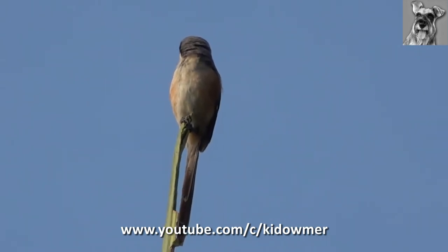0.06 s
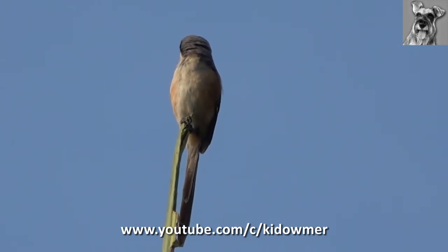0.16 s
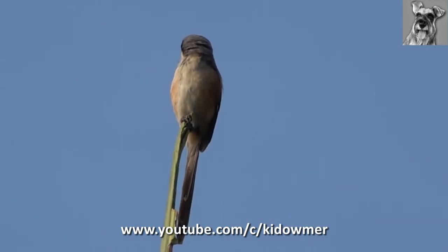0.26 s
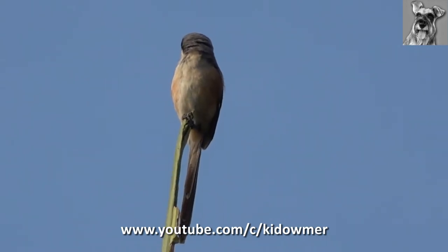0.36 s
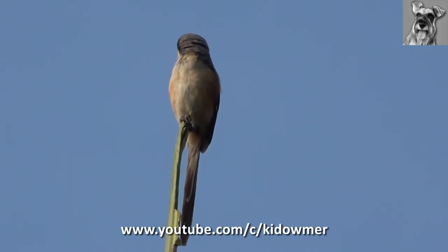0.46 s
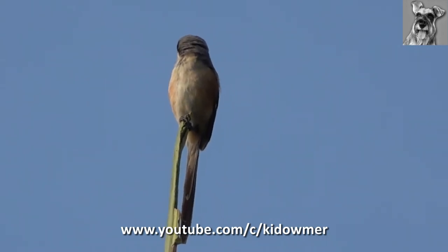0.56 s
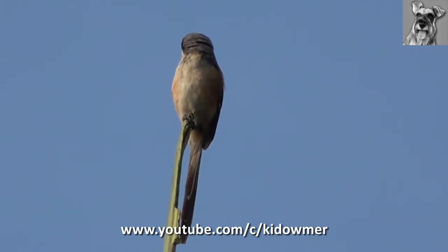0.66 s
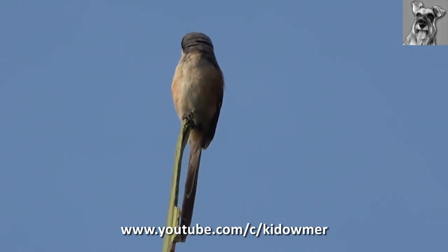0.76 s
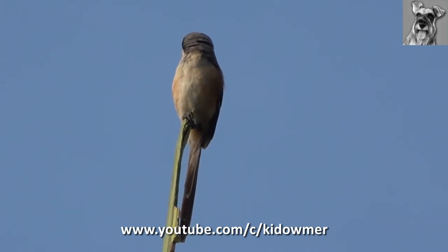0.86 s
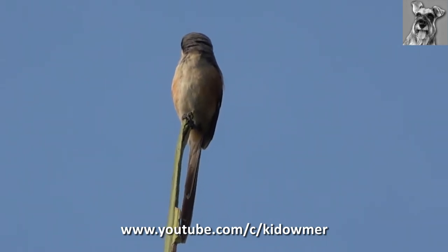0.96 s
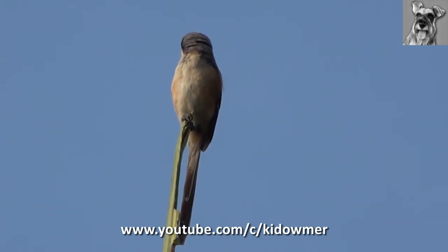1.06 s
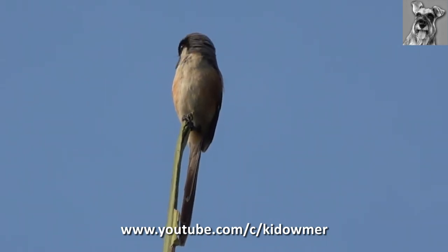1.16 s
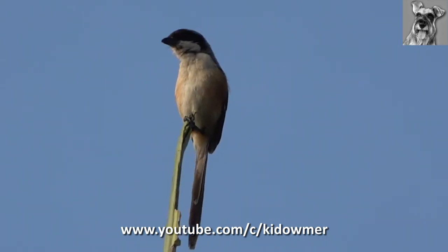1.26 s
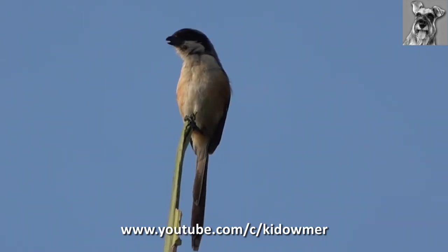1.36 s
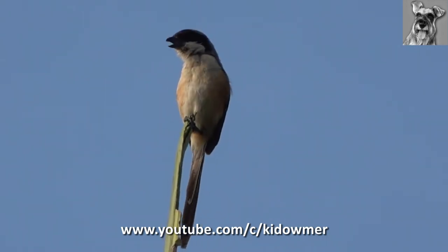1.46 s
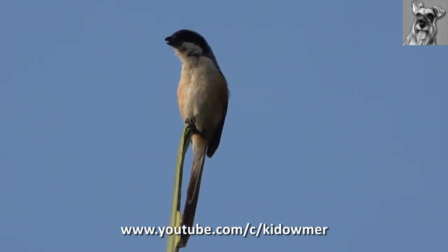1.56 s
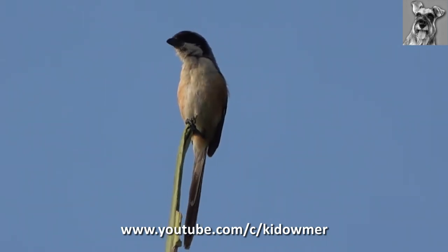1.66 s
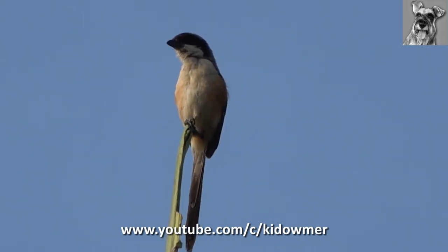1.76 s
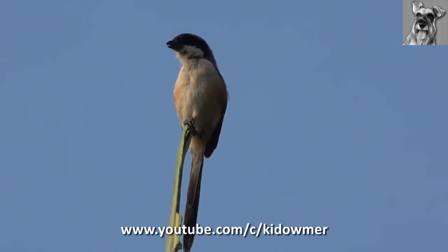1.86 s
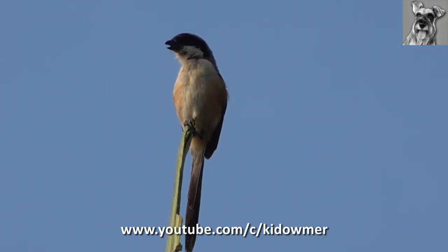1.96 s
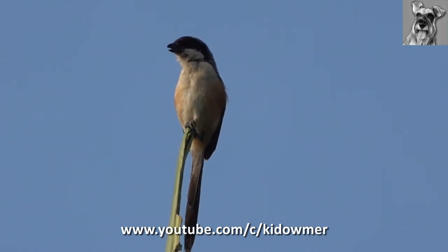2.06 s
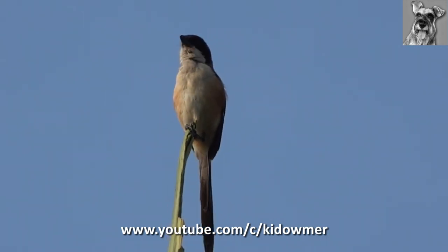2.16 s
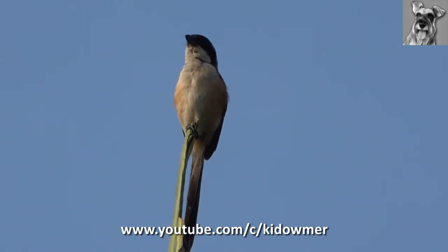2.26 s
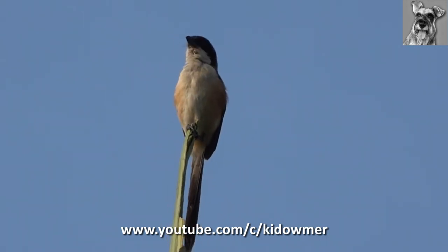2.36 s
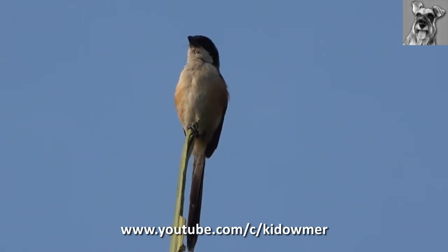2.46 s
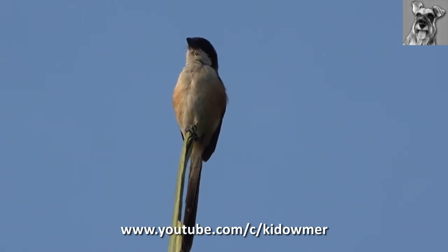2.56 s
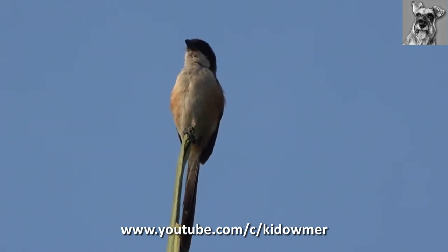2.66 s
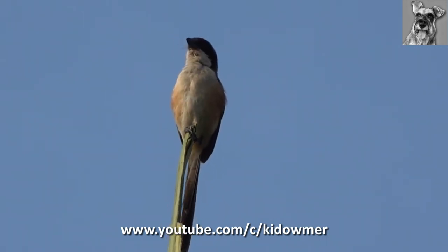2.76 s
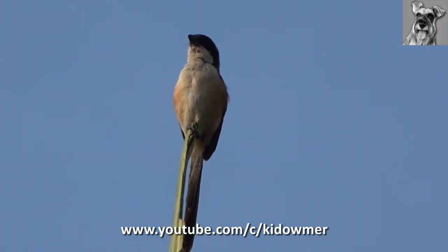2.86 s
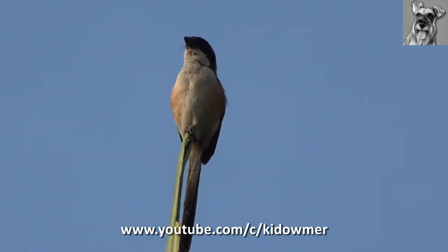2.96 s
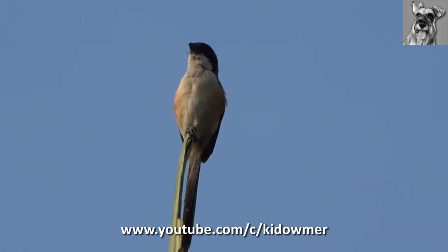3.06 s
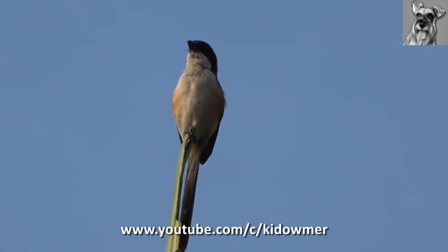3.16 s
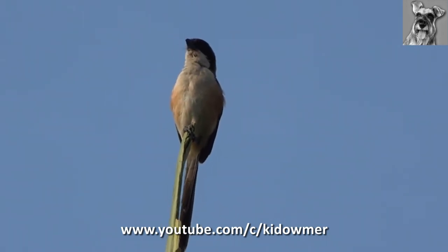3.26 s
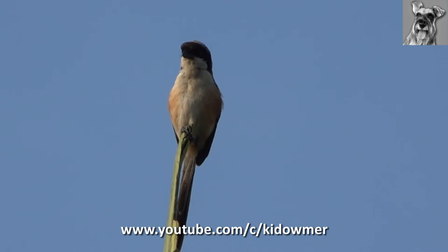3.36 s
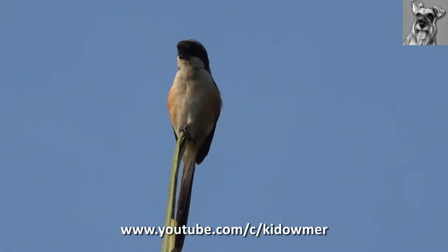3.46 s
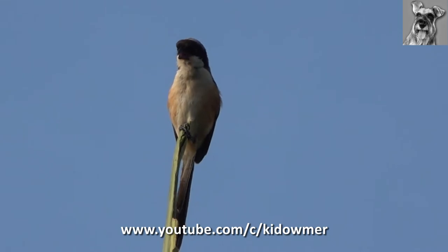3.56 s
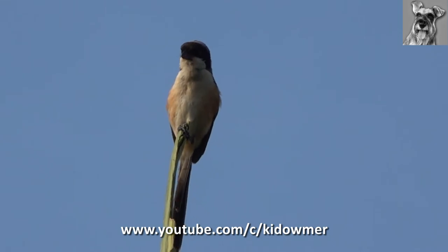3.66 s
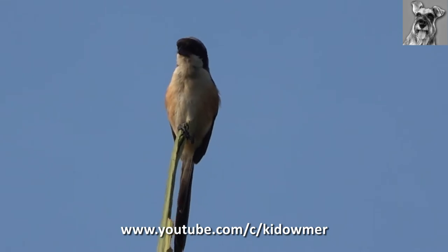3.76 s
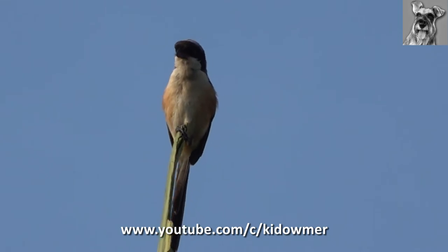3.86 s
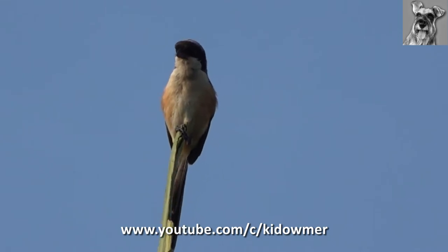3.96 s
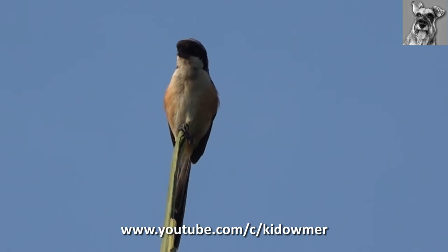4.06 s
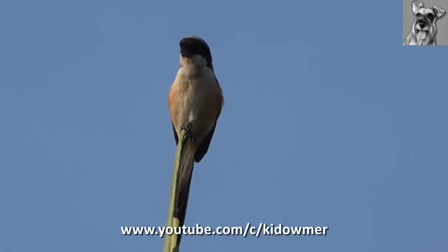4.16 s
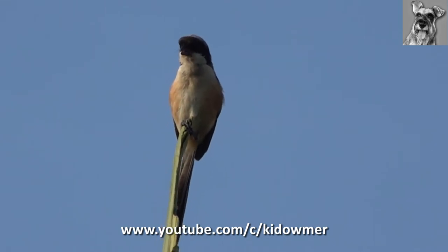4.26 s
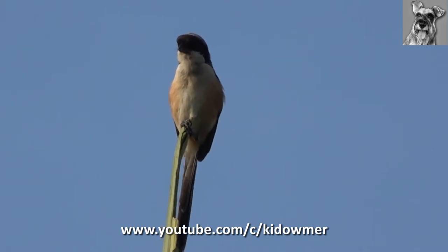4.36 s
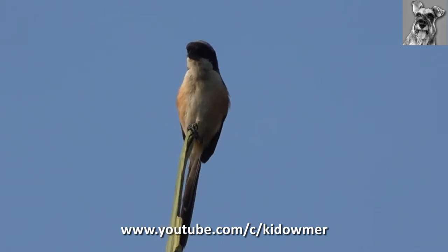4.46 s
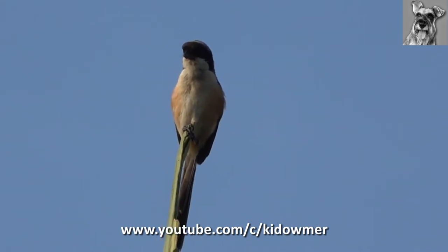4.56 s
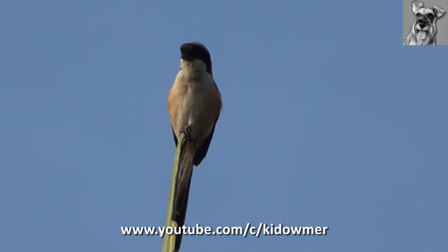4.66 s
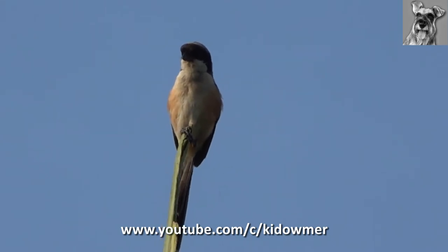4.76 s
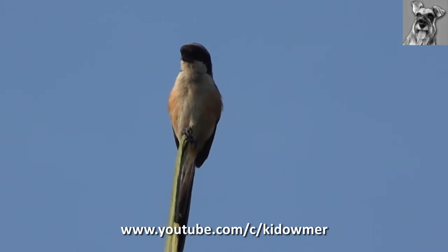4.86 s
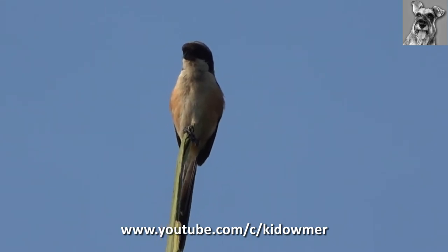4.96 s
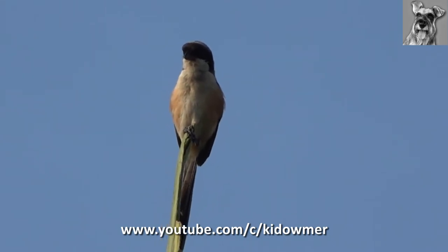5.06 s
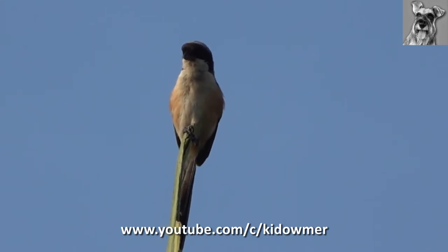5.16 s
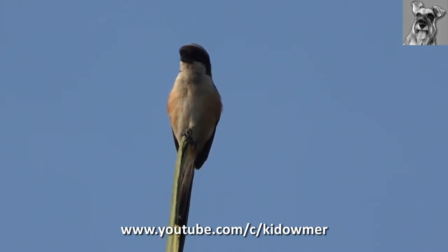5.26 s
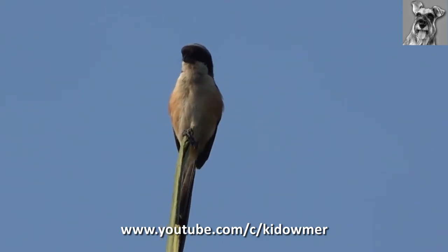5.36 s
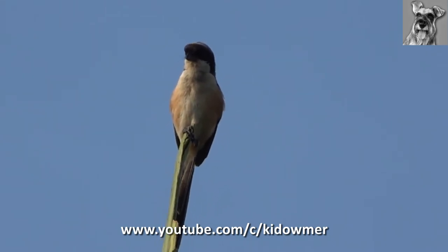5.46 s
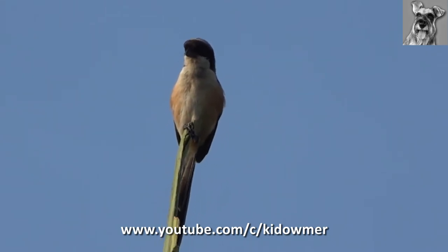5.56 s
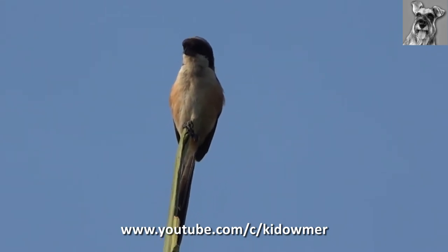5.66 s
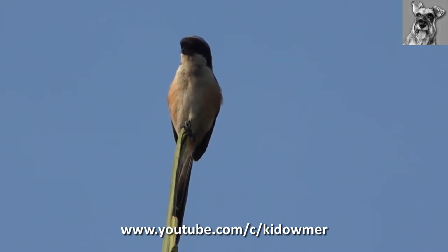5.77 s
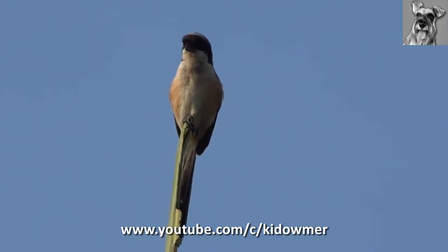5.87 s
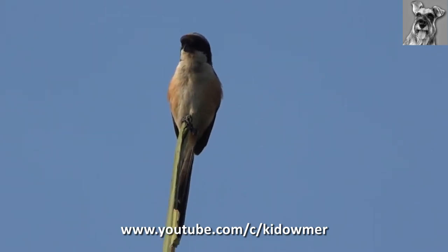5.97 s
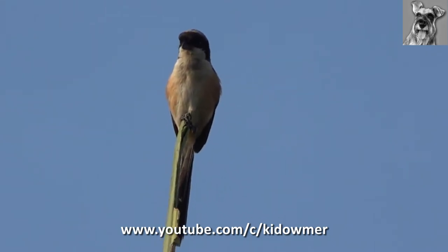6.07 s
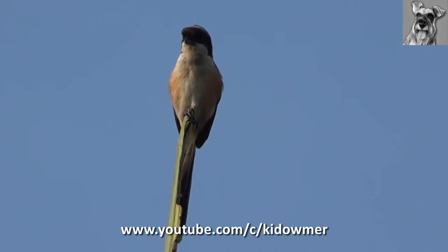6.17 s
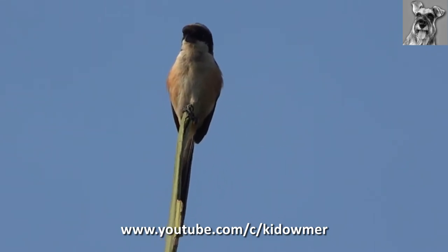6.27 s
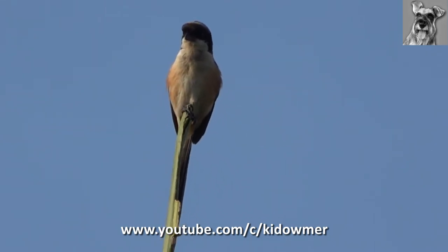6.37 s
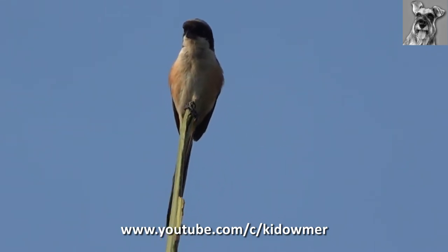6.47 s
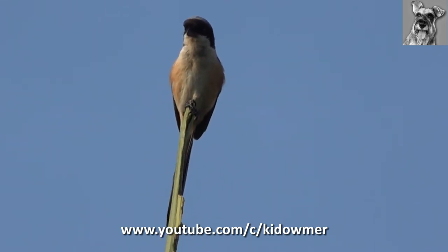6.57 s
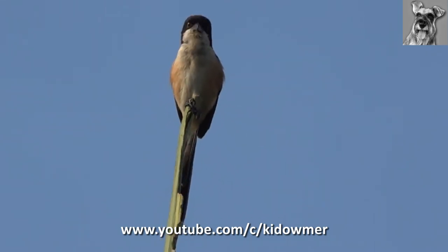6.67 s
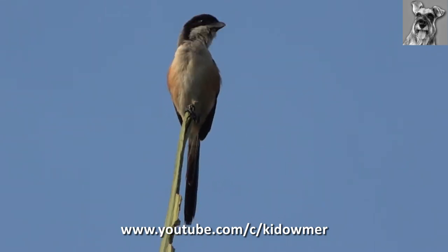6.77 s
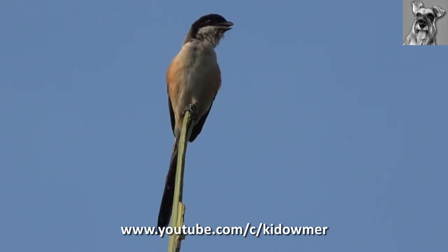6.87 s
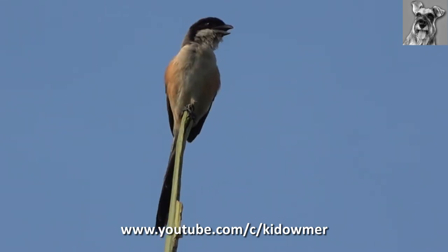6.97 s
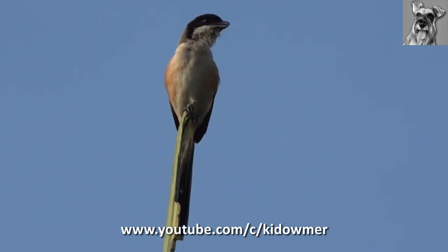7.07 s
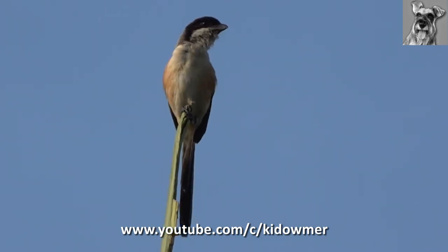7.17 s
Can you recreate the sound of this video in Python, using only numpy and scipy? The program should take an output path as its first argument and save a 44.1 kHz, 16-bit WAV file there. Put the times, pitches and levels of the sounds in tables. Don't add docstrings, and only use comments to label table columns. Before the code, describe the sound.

Five raspy, rattling bird calls of a quarter second each, spaced unevenly, above shrill constant insect hiss, faint crickets, tiny chips and distant traffic.

```python
import sys
import numpy as np
from scipy import signal
from scipy.fft import rfft, irfft, next_fast_len
from scipy.io import wavfile
from scipy.ndimage import uniform_filter1d

SR = 44100
rng = np.random.default_rng(int(sys.argv[2]) if len(sys.argv) > 2 else 0)


def magnitude_from_level(level_db):
    exponent = np.asarray(level_db, float) / 20
    return 10 ** exponent


def output_pcm(signal):
    pcm = np.clip(np.atleast_2d(signal).T, -1, 1) * 32767
    wavfile.write(sys.argv[1], SR, np.round(pcm).astype(np.int16))


N = 318843
HZ = np.fft.rfftfreq(next_fast_len(N), 1 / SR)

# (frequency [Hz], likeness [0-1])
PORT_LIKENESS = [(60, 0.997), (150, .996), (380, 0.955), (950, 0.965), (2380, 0.87), (5980, 0.9),
                 (15000, 0.97)]
# (frequency [Hz], left minus right [dB])
PORT_LEAN = [(60, 0), (150, 0), (380, 0.0), (950, 0.59), (2380, 1.7), (5980, 2.0), (15000, 1.1)]
# (frequency [Hz], density [dB per Hz])
ROAD_SPECTRUM = [(15, -54), (25, -33), (75, -10), (127, -6), (178, -9.5), (266, -17), (570, -5.5),
                 (967, 0.5), (1480, -7.5), (1860, -16), (2610, -23.5), (3900, -28.5), (5070, -51),
                 (8580, -120)]
# (frequency [Hz], density [dB per Hz])
CICADA_SPECTRUM = [(7400, -48.5), (8300, -37.5), (8700, -23.5), (9200, -10.5), (9900, -9), (10300, -3),
                   (10700, -0.5), (11200, -3.5), (11600, -9.5), (12000, -21.5), (12500, -28), (13000, -33),
                   (13600, -34.5)]
# (frequency [Hz], level [dB])
FAR_INSECT_SPECTRUM = [(2500, -32), (3900, -1.5), (5600, -4), (7600, 1), (8200, -16), (9000, -34)]
# (centre [Hz], width [Hz], level [dB])
BUZZERS = [(6560, 540, -62), (4664, 530, -69)]
# (start [s], length [s], level [dB])
LOW_CRICKET = [
    (.566, 0.3, -67),
    (1.701, .33, -67),
    (2.856, 0.29, -67.5),
    (3.863, 0.3, -65.5),
    (4.6, .4, -74.5),
    (5.047, .27, -69),
    (5.971, 0.35, -67),
    (7.122, .3, -66),
]
MID_CRICKET = [(.01, 0.24, -71), (.324, .7, -67), (1.713, 0.64, -71), (2.32, 0.29, -72), (2.825, .34, -71),
               (3.2, 0.22, -74), (3.764, 0.62, -66.5), (4.615, 0.75, -65), (5.792, .66, -66.5),
               (6.522, 0.36, -75), (7.1, .3, -63)]
HIGH_CRICKET = [
    (.704, .33, -69),
    (1.751, .33, -66),
    (2.866, 0.32, -68.5),
    (3.867, .3, -67),
    (4.836, 0.31, -67.5),
    (5.89, 0.26, -66.5),
    (6.2, .6, -83),
    (6.915, 0.36, -68),
]
# (start [s], length [s], from [Hz], to [Hz], level [dB])
BIRD_CHIPS = [(0.046, .07, 4000, 3200, -73), (0.963, 0.035, 2900, 2520, -67), (1.227, .06, 3200, 2690, -67),
              (2.22, .05, 4200, 3900, -61), (.95, 0.033, 3900, 3440, -63), (1.03, 0.11, 4250, 3950, -65),
              (1.102, .09, 4080, 3830, -66), (1.187, 0.034, 3500, 3300, -66.5),
              (1.31, .05, 3600, 3370, -64), (1.76, .015, 4500, 4300, -67), (5.72, .02, 4000, 3880, -66),
              (1.255, 0.04, 3330, 3920, -60), (1.732, 0.023, 3930, 4200, -55),
              (2.17, 0.017, 4020, 3780, -57), (5.484, 0.02, 4200, 3700, -64),
              (5.517, 0.031, 3920, 3760, -65), (5.803, 0.045, 4200, 3320, -57),
              (5.882, 0.017, 2900, 3230, -61), (5.893, 0.026, 3500, 3630, -57)]
# (start [s], length [s], effort [dB], steady whistle re effort [dB], flutter [Hz])
SHRIKE_CALLS = [
    (1.378, 0.23, -38, -6, 109.5),
    (1.874, 0.24, -39.5, -5, 109.1),
    (3.457, 0.23, -40, -3.5, 107.7),
    (4.114, 0.217, -40, -4, 105.8),
    (6.868, 0.23, -38.5, -2.5, 108.3),
]
HEAD_TURN = [0, 0, -4, -4, -17]
# (from [s], to [s], strain [0-1])
STRAIN = [
    (1.435, 1.476, 0.8),
    (1.588, 1.618, 0.82),
    (1.979, 2.046, .75),
    (2.05, 2.11, .9),
    (3.584, 3.687, .85),
    (4.224, 4.258, 0.8),
    (4.281, 4.327, 0.98),
    (6.963, 7.0, .7),
    (7.003, 7.092, 0.95),
]
# (multiple, level [dB])
PARTIALS = [(1, 0), (2, 2.5), (3, 1), (4, -4), (5, -15), (6, -27)]
# (centre [Hz], width [Hz], level [dB])
WINDPIPE = [(3563, 300, -2), (3930, 420, -1), (4350, 300, -5), (5090, 290, -3.5), (5930, 170, 1.5),
            (7050, 590, -5)]
# (frequency [Hz], level [dB])
THROAT = [(1400, -18), (1850, -0.5), (2400, -6.5), (3100, 2), (4200, 1.5), (5200, -6), (5600, -9),
          (7000, -13), (8000, -4), (9000, -3.5), (12000, -14), (14500, -3), (16000, -17)]
# (delay [s], left level [dB], right level [dB])
NEAR_ECHOES = [
    (.0023, -18.5, -33),
    (.0041, -11, -15.5),
    (.0068, -16, -20),
    (0.0113, -13, -12.5),
]
# (frequency [Hz], share [0-1])
SILENT_SHARE = [(5100, 0), (5500, .1), (5900, 0), (7300, 0), (7600, .22), (8100, .22), (8400, 0),
                (12700, 0), (13100, .25), (13500, .7), (14400, .81), (15200, .87), (16000, .91)]


def evened(x):
    return x / np.sqrt(np.mean(x ** 2) + 1e-20)


def read(points, hz):
    f, value = np.transpose(points)
    return np.interp(np.log(hz + 1), np.log(f + 1), value)


def coloured(x, points):
    count = x.shape[-1]
    size = next_fast_len(count)
    gain = magnitude_from_level(read(points, np.fft.rfftfreq(size, 1 / SR)))
    return irfft(rfft(x, size) * gain, size)[..., :count]


def drift(count, smooth):
    once = uniform_filter1d(rng.standard_normal(count), int(smooth))
    return evened(uniform_filter1d(once, int(smooth)))


def oscillation(hz):
    return 2 * np.pi * np.cumsum(hz) / SR


def resonate(x, hz, width):
    turn = np.exp(2j * np.pi * hz * np.arange(x.shape[-1]) / SR)
    r = np.exp(-np.pi * width / SR)
    smooth = signal.lfilter([(1 - r) ** 2], [1, -2 * r, r * r], x / turn)
    return 2 * (turn * smooth).real


def add(mix, s, sound):
    part = mix[..., round(s * SR):][..., :sound.shape[-1]]
    part += sound[..., :part.shape[-1]]


def far_noise(colour_db):
    a, b = rng.standard_normal((2, len(HZ))) + 1j * rng.standard_normal((2, len(HZ)))
    apart = np.sqrt((1 - np.clip(read(PORT_LIKENESS, HZ), 0, 1)) / 2) * (HZ < 11800)
    lean = magnitude_from_level(read(PORT_LEAN, HZ) / 2)
    ports = np.array([(a + apart * b) * lean, (a - apart * b) / lean])
    return evened(irfft(ports * magnitude_from_level(colour_db), next_fast_len(N))[:, :N])


def road():
    swell_db = -55 + 0.46 * drift(N, 7700)
    return magnitude_from_level(swell_db) * far_noise(read(ROAD_SPECTRUM, HZ))


def cicadas():
    throb = 1 + .16 * np.sin(oscillation(133.3 + .8 * drift(N, 6000)))
    swell_db = -43.36 + .5 * drift(N, 3900)
    air_loss_db = read([(13000, 0), (16000, -6)], HZ)
    out = magnitude_from_level(swell_db) * throb * far_noise(read(CICADA_SPECTRUM, HZ) + air_loss_db)
    out += magnitude_from_level(-75.5) * far_noise(read(FAR_INSECT_SPECTRUM, HZ))
    for hz, width, db in BUZZERS:
        waver_db = 1.1 * drift(N, 1500)
        band_db = -10 * np.log10(1 + (2 * (HZ - hz) / width) ** 6)
        out += magnitude_from_level(db + waver_db) * far_noise(band_db)
    return out


def cricket(phrases, hz, chirps_hz):
    out = np.zeros(N)
    for s, length, db in phrases:
        t = np.arange(0, length, 1 / SR)
        turns = np.cumsum(chirps_hz + 0.287 * drift(len(t), 3200)) / SR
        chirp = np.clip(np.sin(2 * np.pi * turns) + 0.54, 0, 1)
        strokes = (0.45 + 0.54 * np.cos(6 * np.pi * turns)) * chirp
        slide_hz = 70.4 * np.sin(-6 * np.pi * turns)
        wing = np.sin(oscillation(hz + slide_hz + 40 * drift(len(t), 90)))
        swell_db = db - 1.5 * (1 - 2 * t / length)
        swell = magnitude_from_level(swell_db) * signal.windows.tukey(len(t), .06)
        add(out, s, swell * evened(strokes * wing))
    return out


def small_birds():
    out = np.zeros(N)
    for s, length, from_hz, to_hz, db in BIRD_CHIPS:
        count = round(length * SR)
        hz = np.linspace(from_hz, to_hz, count) + 110 * drift(count, 30)
        flicker_db = 4 * drift(count, 90)
        add(out, s, magnitude_from_level(db + flicker_db) * np.hanning(count) * np.sin(oscillation(hz)))
    return out


def flung_side(pitch, swing, jump, other):
    phase = oscillation(pitch)
    out = sum(magnitude_from_level(db) * np.cos(k * phase) * (k * pitch < SR / 2 - 2000) for k, db in PARTIALS)
    out *= 1 + swing * ((0.51 + 2.2 * jump) * np.cos(other) + 0.85 * np.cos(2 * other))
    return out * magnitude_from_level(2.2 * swing - 2.3 * jump + 0.95 * drift(len(pitch), 78))


def steady_side(level_db, swing, jump, strain, other):
    level_db = level_db - 2 - 3.2 * jump + 1.5 * (swing - .6) + 1.5 * drift(len(swing), 70)
    strained = magnitude_from_level(0.5) * np.cos(9 * other / 2) + magnitude_from_level(-7) * np.cos(3 * other)
    upper = magnitude_from_level(-14) * np.cos(5 * other)
    tones = np.cos(4 * other) + swing ** 2 * (strain ** 2 * strained + upper)
    return magnitude_from_level(level_db) * np.sqrt(2) * tones


def vocal_tract(flung, steady, beak_db, facing_db):
    voice = evened(flung) + 0.42 * rng.standard_normal(len(flung))
    ringing = sum(magnitude_from_level(db) * resonate(voice, hz, width) for hz, width, db in WINDPIPE)
    voice = coloured(voice + ringing, THROAT)
    voice = evened(evened(voice) + steady)
    treble = coloured(voice, [(7000, -40), (8500, -6), (10000, 0), (13300, 0), (14800, facing_db)])
    return coloured(voice, [(7000, 0), (8500, -6), (10000, -40)]) + magnitude_from_level(beak_db) * treble


def call(start, length, top_db, steady_db, flutter_hz, facing_db):
    low_hz, top_hz, strained_hz, second_hz = 2350, 3470, 3940, 1143
    age = np.arange(0, length, 1 / SR)
    t = start + age
    count = len(t)
    effort_db = top_db - 20 * np.exp(-age / 0.018) - 3 * (1 - age / length)
    effort_db = effort_db - 12 * np.exp((age - length) / 0.011)
    beak_db = -5 * np.exp(-age / 0.047)

    turns = np.cumsum(flutter_hz + 3 * (age / length - .5) + 1.58 * drift(count, 260)) / SR
    push = .5 - .5 * np.cos(2 * np.pi * turns) + 0.0403 * drift(count, 79)
    strain = uniform_filter1d(sum(share * (t > a) * (t < b) for a, b, share in STRAIN), 200)
    tension = 1 + .018 * (uniform_filter1d(strain, int(.08 * SR)) - .5)
    strain = np.clip(strain + 0.0696 * drift(count, 255), 0, 1)
    swing = np.sin(np.pi / 2 * np.clip(push / .82, 0, 1))
    jump = np.clip((push + strain - 1.63) / .17, 0, 1)
    warm = .92 + .08 * np.clip(age / 0.02997, 0, 1)

    ledge_hz = top_hz * warm * tension + 28 * drift(count, 380)
    pitch = low_hz + (ledge_hz - low_hz) * swing + (strained_hz - top_hz) * jump + 45 * drift(count, 30)
    other = oscillation(second_hz * tension + 13 * drift(count, 97) + 8 * drift(count, 1230))
    flung = flung_side(pitch, swing, jump, other)
    steady = steady_side(steady_db - 44 * (1 - warm), swing, jump, strain, other)
    voice = vocal_tract(flung, steady, beak_db, facing_db)
    return magnitude_from_level(effort_db) * signal.windows.tukey(count, .04) * voice


def shrike():
    out = np.zeros(N)
    for (s, *row), facing_db in zip(SHRIKE_CALLS, HEAD_TURN):
        add(out, s, call(s, *row, facing_db))
    return out


def near_echoes(x):
    out = np.zeros((2, N))
    for delay, *db in NEAR_ECHOES:
        add(out, delay, magnitude_from_level(np.array(db))[:, None] * x)
    return out


def trees(x):
    t = np.arange(SR) / SR
    taps = rng.standard_normal((2, SR)) * (rng.random((2, SR)) < .2)
    taps[1] = 0.51 * taps[0] + 0.41 * taps[1]
    tail = taps * magnitude_from_level(-60 * t / 0.85) * np.clip(t / 0.015, 0, 1)
    tail = coloured(tail, [(2000, -1.0), (4000, -5.5), (6000, -4.5), (10000, -7), (15000, -20)])
    sway = 7 * drift(N, 526)
    x = np.interp(np.arange(N) + sway, np.arange(N), x)
    return signal.fftconvolve(x[None], tail / np.linalg.norm(tail[0]), axes=1)[:, :N]


def scene():
    background = road() + cicadas()
    crickets = cricket(LOW_CRICKET, 4390, 21.2)
    crickets += cricket(MID_CRICKET, 4720, 23.2)
    crickets += cricket(HIGH_CRICKET, 5075, 23.7)
    far = magnitude_from_level(-1.5) * (crickets + small_birds())
    calls = shrike()
    bird = calls * magnitude_from_level([[.15], [-.15]]) + near_echoes(calls)
    echo = trees(magnitude_from_level(-16) * calls + magnitude_from_level(-5) * far)
    return bird + far * magnitude_from_level([[.4], [-.4]]) + echo + background


def hush_faint_bands(x):
    bins = 12
    hz, _, z = signal.stft(x, SR, nperseg=2048, noverlap=1024)
    band = np.arange(len(hz)) // bins
    power = np.add.reduceat((abs(z) ** 2).sum(0), np.arange(0, len(hz), bins))
    level_db = 10 * np.log10(uniform_filter1d(power, size=2) + 1e-20) + drift(power.shape[1], 4)
    rank = level_db.argsort().argsort() / power.shape[1]
    kept = rank[band] >= read(SILENT_SHARE, hz[band * bins])[:, None]
    return signal.istft(z * kept, SR, nperseg=2048, noverlap=1024)[1][:, :N]


def top_cut(x):
    return signal.sosfilt(signal.butter(12, 15780, fs=SR, output="sos"), x)


def record(dry):
    mix = hush_faint_bands(dry)
    return top_cut(mix)


dry = scene()
out = record(dry)
output_pcm(out)
```